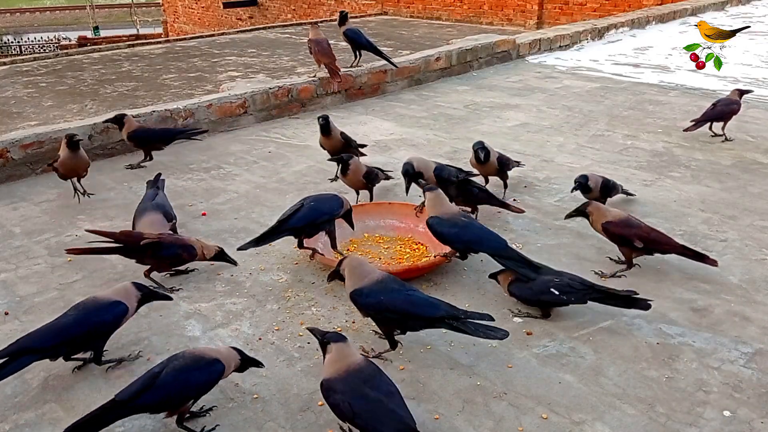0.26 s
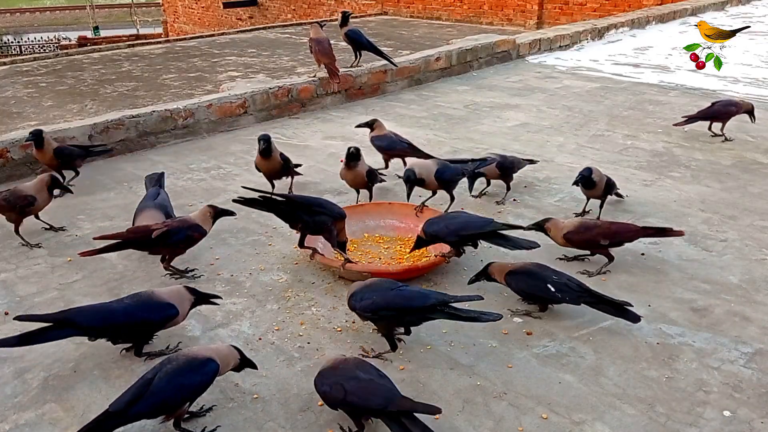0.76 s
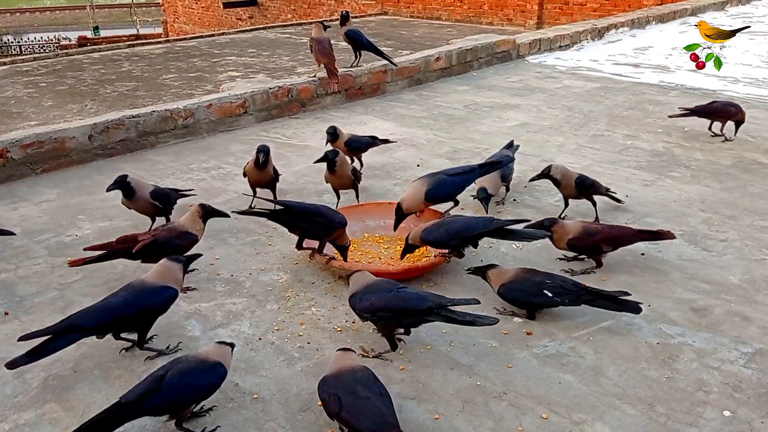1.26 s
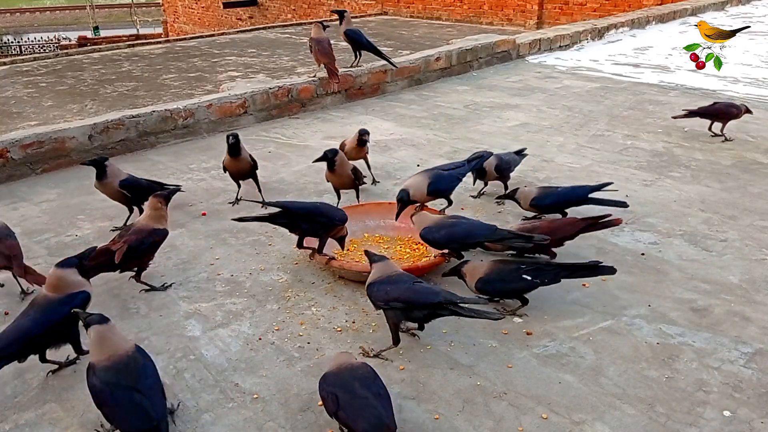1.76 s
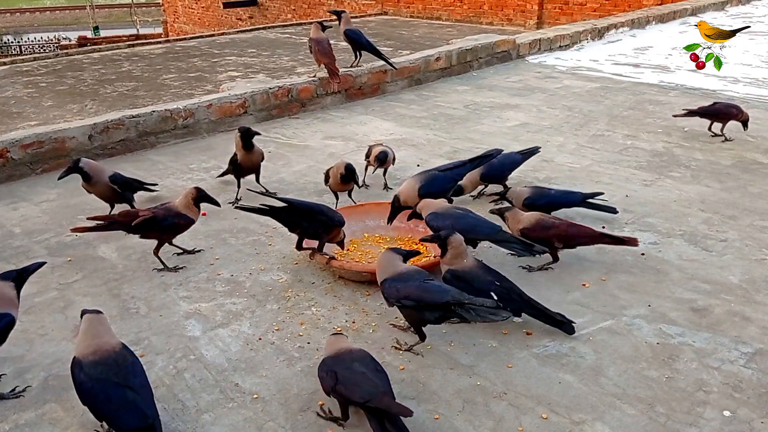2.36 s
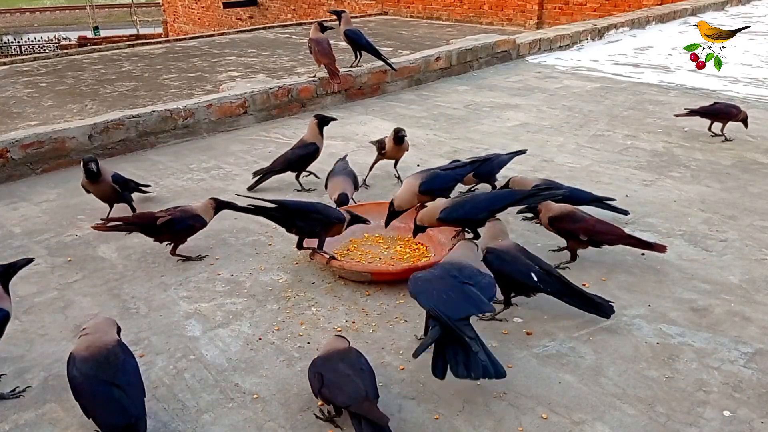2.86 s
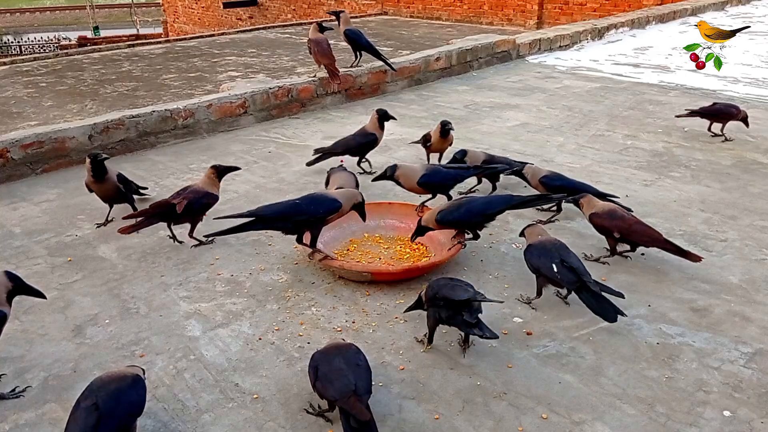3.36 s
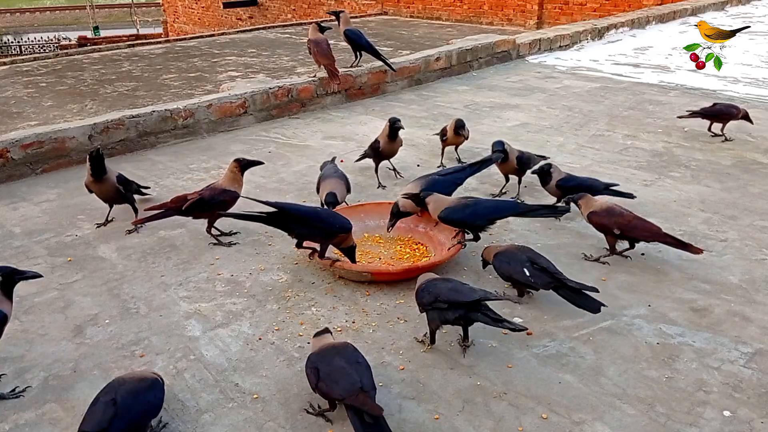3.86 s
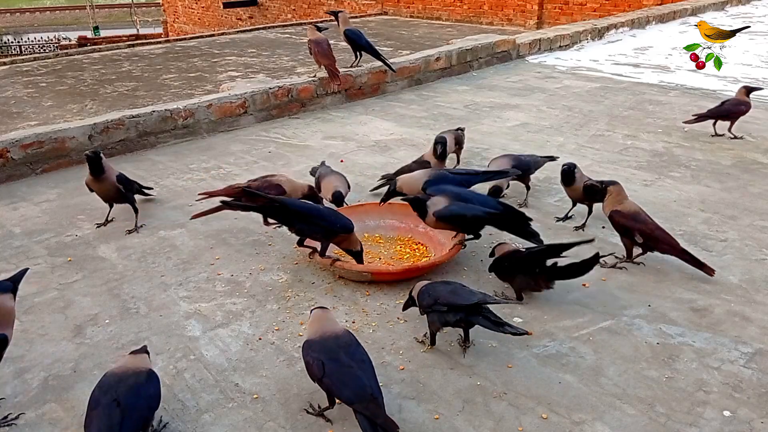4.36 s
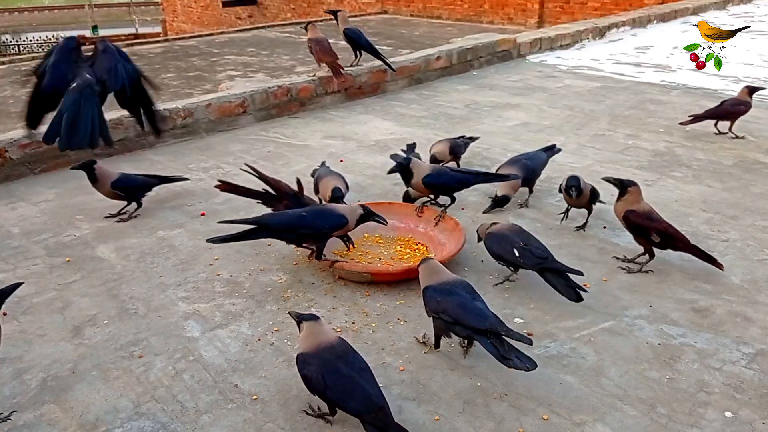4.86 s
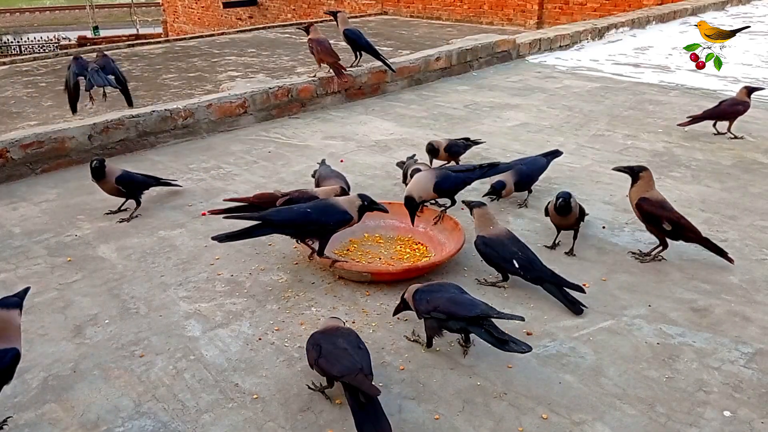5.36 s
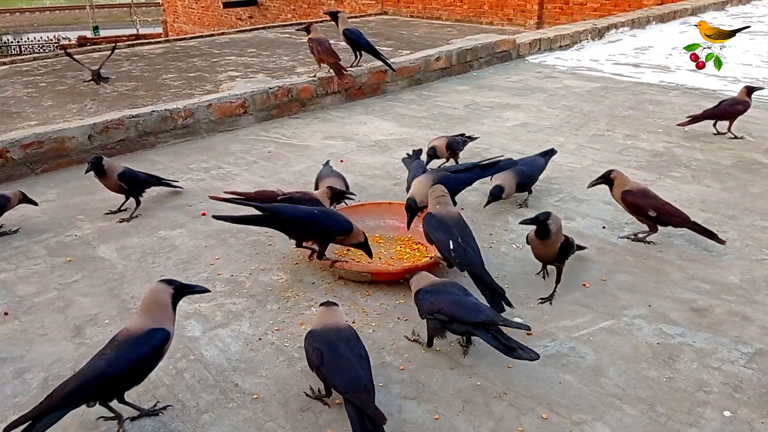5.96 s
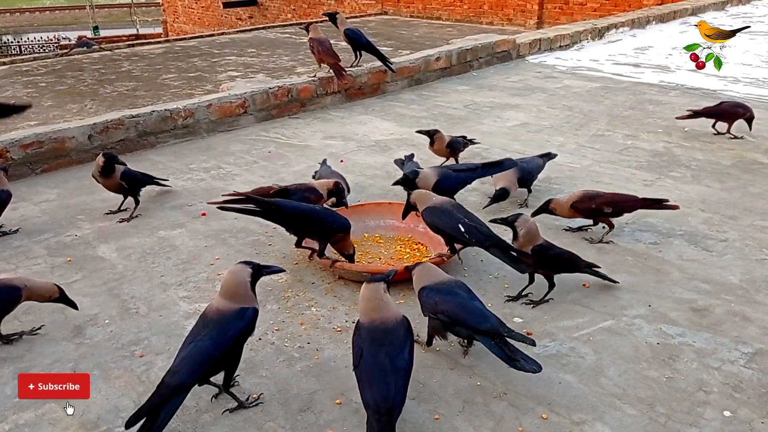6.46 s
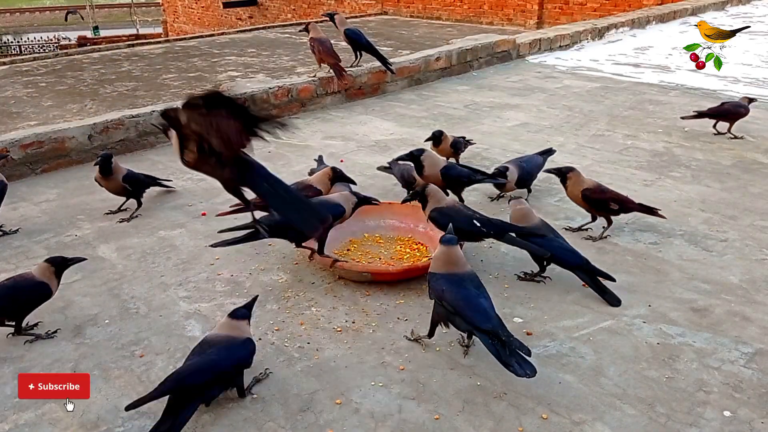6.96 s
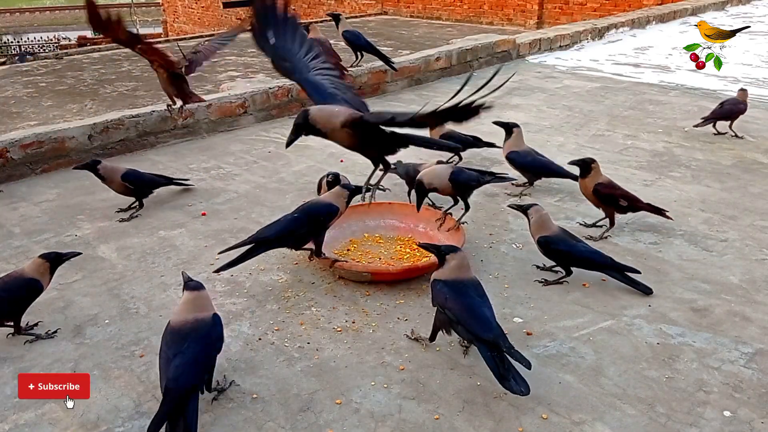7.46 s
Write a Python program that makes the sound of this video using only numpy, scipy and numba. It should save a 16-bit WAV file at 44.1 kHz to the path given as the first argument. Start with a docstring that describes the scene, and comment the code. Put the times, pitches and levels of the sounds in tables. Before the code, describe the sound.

Short buzzing crow caws, hard little beak ticks and rushes of wings on a concrete roof, over faint distant hum and chirps.

```python
"""House crows on a roof

House crows caw round a clay feeding bowl on a concrete roof, more often after the first calls.
Each caw is an arching buzz, shaken about 80 times a second and rung through windpipe, throat and beak.
Beaks peck with hard ticks, wings push rushes of air, claws tick, and small birds chirp far off.
Nearby walls echo all of this over a faint town noise and hum."""
import sys
import numpy as np
from scipy import signal
from scipy.fft import rfft, irfft
from scipy.io import wavfile
from scipy.ndimage import uniform_filter1d, map_coordinates
from numba import njit

SR = 44100
rng = np.random.default_rng(int(sys.argv[2]) if len(sys.argv) > 2 else 0)


def waveform_to_disk(signal):
    """Save audio, clipped to [-1, 1], as 16-bit WAV at the path in sys.argv[1]."""
    frames = np.transpose(np.atleast_2d(signal))
    scaled = np.clip(frames, -1, 1) * 32767
    samples = np.round(scaled).astype(np.int16)
    wavfile.write(sys.argv[1], SR, samples)


N = 340452  # length of the scene [samples]

# colour of crinkling feathers and ticking claws: (frequency [Hz], level [dB])
FEATHERS = [(410, -60), (700, -20), (886, 2.5), (1060, -6.5), (1520, -11), (2000, -7), (2990, -10.5),
            (6230, -4.5), (8100, -21), (13100, -28.5), (16000, -20)]


def undb(db):
    """Turn decibels into a gain."""
    return 10 ** (np.asarray(db) / 20)


def unit(x):
    """Scale to an average (rms) strength of 1."""
    return x / np.sqrt(np.mean(x ** 2) + 1e-20)


def add(out, s, x):
    """Mix x into out from time s."""
    i = max(int(s * SR), 0)
    out[i:i + len(x)] += x[:max(len(out) - i, 0)]


def curve_gain(points, grid_hz):
    """Gains along a curve of (Hz, dB) points, drawn on a logarithmic pitch scale."""
    hz, db = np.transpose(points)
    return undb(np.interp(np.log(np.maximum(grid_hz, 1)), np.log(hz), db))


def colour(x, points):
    """Filter x to follow (Hz, dB) points, with no sound ahead of its cause."""
    size = 2048
    gain = curve_gain(points, np.arange(size // 2 + 1) * SR / size)
    # folding the cepstrum gives the response that acts as early as possible
    cepstrum = irfft(np.log(gain))
    cepstrum[1:size // 2] *= 2
    cepstrum[size // 2 + 1:] = 0
    response = irfft(np.exp(rfft(cepstrum)))
    return signal.fftconvolve(x, response)[:len(x)]


def ring(x, hz, width_hz):
    """One resonance, with gain 1 at its centre."""
    b, a = signal.iirpeak(min(hz, .45 * SR), hz / width_hz, fs=SR)
    return signal.lfilter(b, a, x)


def steep(x, hz, width_hz):
    """A resonance applied twice, so less passes on either side of it."""
    return ring(ring(x, hz, width_hz), hz, width_hz)


@njit
def glide(x, hz, width_hz):
    """A resonance whose centre moves from sample to sample."""
    y, band, low = np.empty(len(x)), 0., 0.
    for i in range(len(x)):
        g, k = np.tan(np.pi * hz[i] / SR), width_hz / hz[i]
        v = (band + g * (x[i] - low)) / (1 + g * (g + k))
        band, low, y[i] = 2 * v - band, low + 2 * g * v, k * v
    return y


def wander(n, rate):
    """Smooth random drift around 0, of spread 1, with rate new targets a second."""
    place = np.arange(n) * rate / SR
    targets = rng.standard_normal(int(place[-1]) + 2)
    return map_coordinates(targets, [place], order=1, mode="nearest") * np.sqrt(3 / 2)


def tone(hz):
    """A pure tone that follows a pitch curve."""
    return np.sin(2 * np.pi * np.cumsum(hz) / SR)


def even(x, size=1100):
    """Hold the slow level near 1 and keep the fast flutter."""
    power = uniform_filter1d(uniform_filter1d(x ** 2, size), size // 2)
    return x / np.sqrt(power + 1e-14)


def town(wash_db=-58, waver_db=2.0):
    """Distant town noise is a low wash of noise plus a hum whose bands waver on their own."""
    # colour of the wash: (frequency [Hz], level [dB])
    wash_colour = [(15, -56), (25, -37.5), (70, -2.5), (130, -7), (195, -9), (223, -12.5), (344, -6),
                   (476, -22), (607, -12.5), (754, -26), (1700, -24), (3520, -33.5), (6380, -36),
                   (7920, -48.5), (16000, -52.5)]
    # bands of the hum: (frequency [Hz], width [Hz], level before the slow drift [dB])
    hum_bands = [(78.6, 8, -65), (338.7, 5.4, -61.5), (380, 51, -66), (608, 32, -76.5)]
    # slow drift of the hum's level: (time [s], change [dB])
    hum_drift = [(0, 3.5), (1.3, -2), (2.5, -13.5), (3.3, -5), (5.6, 0.5), (7.7, 3)]
    gain = curve_gain(wash_colour, np.arange(N // 2 + 1) * SR / N)
    wash = unit(irfft(rfft(rng.standard_normal(N)) * gain, N))
    hum = np.zeros(N)
    for hz, width, db in hum_bands:
        band = steep(rng.standard_normal(N), hz, width) * undb(waver_db * wander(N, 14))
        hum += undb(db) * unit(band)
    drift_db = np.interp(np.arange(N) / SR, *np.transpose(hum_drift))
    return wash * undb(wash_db) + hum * undb(drift_db)


def far_notes(notes, waver, waver_rate):
    """Thin, slightly wavering whistled tones that swell and fade."""
    out = np.zeros(N)
    for s, length, from_hz, to_hz, db in notes:
        n = int(length * SR)
        hz = np.linspace(from_hz, to_hz, n) * (1 + waver * wander(n, waver_rate))
        add(out, s, tone(hz) * np.hanning(n) * undb(db))
    return out


def far_birds(chirp_db=-1, hoot_db=-1):
    """Far birds give high chirps and soft low hoots, each a sliding tone."""
    # both: (time [s], length [s], start pitch [Hz], end pitch [Hz], level before the group's gain [dB])
    chirps = [(0.464, 0.056, 5240, 5800, -63), (0.519, 0.075, 6250, 5740, -61.5),
              (0.612, 0.086, 4060, 4350, -59.5), (0.717, 0.067, 4300, 4060, -64),
              (1.225, 0.053, 5140, 5030, -67), (2.23, 0.06, 6200, 5030, -54),
              (2.27, 0.041, 4430, 4300, -61), (2.537, 0.069, 7000, 5800, -55.5),
              (2.585, 0.083, 6000, 6470, -58.5), (2.73, 0.076, 6900, 6100, -69)]
    # the low notes are perhaps doves
    hoots = [(0.28, 0.19, 650, 620, -53.5), (0.47, 0.18, 350, 400, -51), (0.66, .26, 650, 574, -55.5),
             (2.1, 0.35, 570, 630, -56)]
    high = far_notes(chirps, waver=.03, waver_rate=1100) * undb(chirp_db)
    low = far_notes(hoots, waver=0.057, waver_rate=130) * undb(hoot_db)
    return high + low


def claws(count=80, level_db=-59, spread_db=4, tick_s=0.005):
    """Claws and seeds make faint ticks on the concrete: short noise bursts, levels set before colouring."""
    out, t = np.zeros(N), np.arange(SR // 30) / SR
    for s, size in zip(rng.uniform(0, N / SR, count), rng.standard_normal(count)):
        tick = rng.standard_normal(len(t)) * np.exp(-t / tick_s)
        add(out, s, tick * undb(level_db + spread_db * size))
    return colour(out, FEATHERS)


def wing(n, hz, air_db, feather_db, breadth=0.21, swish_db=-15, crinkle_db=2.5):
    """A moving wing pushes a low rush of air; its feathers swish and crinkle."""
    rush = even(steep(rng.standard_normal(n), hz, hz * breadth + 60), size=600)
    swish = unit(ring(rng.standard_normal(n), 950, 830))
    uneven_noise = rng.standard_normal(n) * undb(crinkle_db * wander(n, 230))
    crinkle = unit(colour(uneven_noise, FEATHERS))
    return undb(air_db) * (rush + undb(swish_db) * swish) + undb(feather_db) * crinkle


def wings(rush_hz=388.5, stroke_s=0.15, beat_hz=8.81, beat_db=3.5, unevenness=0.37, fade_s=0.15):
    """Wings beat unevenly in flurries, with single strong strokes on top."""
    # birds jostle, take off and land: (start [s], end [s], air before beating [dB], feathers likewise [dB])
    flurries = [(3.622, 3.956, -52, -65), (4.36, 5.45, -54, -58), (6.78, 7.612, -55.5, -67)]
    # strokes that stand out: (strongest time [s], rush pitch [Hz], air at its peak [dB], feathers likewise [dB])
    strokes = [(3.705, 389, -47, -66), (3.914, 411.5, -45, -62.5), (4.035, 363.3, -44.5, -56),
               (4.11, 438.5, -42, -62), (4.577, 229.7, -39, -49), (4.603, 419, -46, -57),
               (4.732, 402, -48.5, -57), (4.905, 334, -44.5, -54.5), (4.967, 396, -43.5, -74),
               (5.058, 212.3, -42, -58), (5.117, 369, -41, -51.5), (5.287, 379.5, -49, -53.5),
               (5.447, 358, -46.5, -60), (6.901, 396.4, -46.5, -53), (6.996, 200.7, -31.5, -45),
               (7.127, 199, -51, -64), (7.203, 448.4, -45, -50), (7.479, 226.6, -47, -75),
               (7.537, 406, -46.5, -80)]
    out = np.zeros(N)
    for start, end, air_db, feather_db in flurries:
        n = int((end - start) * SR)
        beat = tone(beat_hz * (1 + unevenness * wander(n, 12.23)))
        swell = signal.windows.tukey(n, 2 * fade_s / (end - start))
        add(out, start, wing(n, rush_hz, air_db, feather_db) * swell * undb(beat_db * beat))
    for s, hz, air_db, feather_db in strokes:
        n = int(stroke_s * hz / rush_hz * SR)  # deeper strokes are shorter in proportion
        add(out, s - n / SR / 2, wing(n, hz, air_db, feather_db) * np.hanning(n) ** 2)
    return out


def pecks(tick_s=0.0012, scatter_s=0.02, scatter_db=-16, ring_db=7):
    """A peck is a hard tick, a short ring of beak and bowl, and a scatter of grain."""
    # beaks on bowl and concrete: (time [s], peak level [dB], ring pitch [Hz], body against the tick [dB])
    blows = [(0.309, -39.5, 5670, -3), (0.5148, -42.5, 5900, -35), (0.85, -32, 6150, -7.5),
             (1.1139, -24.5, 3830, -12.5), (1.357, -46.5, 3000, 11), (1.487, -44, 6700, -25),
             (1.853, -39, 6200, -2), (2.0448, -33, 5450, -10), (2.214, -34, 6240, -15),
             (2.3328, -40.5, 6700, -9), (2.8718, -23, 5470, 9), (3.0002, -21, 5230, 2.5),
             (3.137, -51, 3150, -23), (3.325, -46, 5270, 14), (3.8454, -27, 6800, -8),
             (4.458, -33.5, 6500, -25), (4.5356, -33.5, 6330, -12), (4.7266, -38, 5410, 5),
             (5.9538, -33.5, 6700, -5), (5.988, -37.5, 5490, 1.5), (6.4117, -28.5, 5960, 8)]
    # colour of the tick: (frequency [Hz], level [dB])
    tick_colour = [(180, -39), (300, -8), (885, -32.5), (2480, 0.5), (3030, -11), (3760, -8), (4520, -2.5),
                   (6410, -2), (8090, -19.5), (12300, -19), (16000, -13.5)]
    out, t = np.zeros(N), np.arange(SR // 10) / SR
    fade = np.exp(-t / tick_s) + undb(scatter_db) * np.exp(-t / scatter_s)
    for s, db, hz, body_db in blows:
        blow = rng.standard_normal(len(t)) * fade
        tick = colour(blow, tick_colour)
        bright = unit(tick + undb(ring_db) * ring(tick, hz, 460))
        body = unit(steep(blow, 1730, 1300))
        sound = bright + undb(body_db) * body
        add(out, s, sound / np.abs(sound).max() * undb(db))
    return out


def syrinx(hz, along, depth, settle, rough, flutter_hz=78.28, skew=0.34, throb_db=5.0, throb_lag=0.57,
           throb_fade=1.0, flutter_jitter=0.067, fray=3.09, shimmer_db=1.45):
    """Membranes in the voice organ buzz near 500 Hz while a slower flutter shakes pitch and strength."""
    n = len(hz)
    loose = 0.416 + fray * np.abs(along - .33)  # steadiest a third of the way in, fraying at both ends
    flutter_rate = flutter_hz * (1 + flutter_jitter * loose * wander(n, 119.7))
    flutter = 2 * np.pi * np.cumsum(flutter_rate) / SR
    swing = depth * (1 - settle * along ** 2) * (np.sin(flutter) + skew * np.sin(2 * flutter))
    phase = 2 * np.pi * np.cumsum(hz * (1 + swing + rough * loose * wander(n, 500))) / SR
    orders = np.arange(1, 33)[:, None]
    # the low harmonics are locked to the closing membranes, the high ones scatter
    scatter = rng.uniform(0, 2 * np.pi, orders.shape) * (orders > 4)
    buzz = unit(np.cos(orders * phase + scatter).sum(axis=0))
    throb = np.cos(flutter - throb_lag) * (1 - throb_fade * along)  # hardest while air pressure is high
    strength = undb(throb_db * throb + shimmer_db * loose * wander(n, 300))
    return buzz, strength, throb


def rasp(harsh, gape, beak, treble_db, follow=0.42, broad_db=-10, round_trip_s=0.00124, bounce=0.65):
    """The bright part of a caw: beak resonances and a windpipe echo, all gliding with the gape."""
    # colour of the rasp that leaves the open beak: (frequency [Hz], level [dB])
    beak_colour = [(2100, -45.5), (2800, -17), (3300, -5), (4050, 4), (5600, 0), (6900, 3.5), (8300, -7),
                   (9700, -8), (11000, -19.5), (12300, -20), (13600, -26), (15200, -12)]
    peaks = np.zeros(len(harsh))
    for hz, width, db in beak:
        peaks += undb(db) * glide(harsh, hz * gape ** follow, float(width))
    delay = round_trip_s * SR / gape ** follow
    echo = map_coordinates(harsh, [np.arange(len(harsh)) - delay], order=3)
    bright = peaks + undb(broad_db) * (harsh + bounce * echo)
    return colour(colour(bright, beak_colour), [(5500, 0.006), (10000, treble_db)])


def effort(t, length, attack_s, droop_db, release_s, onset_db=-25, end_db=-11.5):
    """Loudness of a caw in dB: a quick push, a droop as the air runs out, a short release."""
    closing = np.clip(1 - (length - t) / release_s, 0, 1)
    return onset_db * np.exp(-t / attack_s) - droop_db * (t / length) ** 2 + end_db * closing


def caw(row, beak, air_db=-27, hiss_db=-9, rasp_throb_db=0.0, throat_follow=0.41, skirt_hz=1400.0,
        edge=0.87, windpipe_width_hz=420.0, low_cut_hz=560, bite_db=5.5, bite_s=0.048, shut_rasp_db=-4):
    """The buzz rings windpipe, throat and beak, whose resonances move as the beak opens and shuts."""
    # pitch arch through a caw, before its depth is applied: (share of the length, share of the pitch)
    pitch_arch = [(0, .73), (.1, .89), (.2, 0.97), (.36, 0.98), (.6, 0.96), (.8, .855), (.9, .745),
                  (1, .52)]
    (start, end, level_db, attack_s, droop_db, release_s, top_hz, arch_depth, depth, settle, rough,
     throat_hz, throat_width_hz, pipe_db, rasp_db, treble_db) = row
    n = int((end - start) * SR)
    t, along = np.arange(n) / SR, np.arange(n) / n
    gape = np.interp(along, *np.transpose(pitch_arch)) ** arch_depth
    buzz, strength, throb = syrinx(top_hz * gape, along, depth, settle, rough)
    air = rng.standard_normal(n)
    source = strength * (buzz + undb(air_db) * air)

    quiver = gape * (1 + 16 * rough ** 2 * wander(n, 450))  # the hoarsest calls shake the whole throat
    centre = throat_hz * quiver ** throat_follow
    throat = glide(glide(source, centre, float(throat_width_hz)), centre, skirt_hz)
    edge_hz = max(throat_hz + edge * throat_width_hz, 2250)  # the throat passes little above its resonance
    throat = signal.sosfilt(signal.butter(6, edge_hz, fs=SR, output="sos"), throat)
    second_hz = 2 * top_hz * gape  # the windpipe stays tuned to the second harmonic
    windpipe = glide(glide(source, second_hz, windpipe_width_hz), second_hz, windpipe_width_hz)
    shut_db = np.interp(along, [.85, 1], [0, -9])  # the closing beak muffles throat against windpipe
    voice = undb(shut_db) * throat + undb(pipe_db) * windpipe
    voice = signal.sosfilt(signal.butter(4, low_cut_hz, "high", fs=SR, output="sos"), voice)

    harsh = strength * undb(rasp_throb_db * throb) * (buzz + undb(hiss_db) * air)
    # extra rasp at the first push fades, and a narrower beak holds some back
    extra_db = bite_db * np.exp(-t / bite_s) + shut_rasp_db * (1 - gape)
    bright = even(rasp(harsh, quiver, beak, treble_db)) * undb(rasp_db + extra_db)
    loudness = undb(level_db + effort(t, end - start, attack_s, droop_db, release_s))
    return (even(voice) + bright) * loudness * signal.windows.tukey(n, .05)


def groan(top_hz, length_s=.1, from_share=1.8, to_share=0.7, waver=0.038):
    """The slackening membranes end a caw with a soft tone that slides down."""
    n = int(length_s * SR)
    hz = top_hz * np.geomspace(from_share, to_share, n) * (1 + waver * wander(n, 300))
    return tone(hz) * np.hanning(n)


def crows(gain_db=-0.8, groan_db=-11, groan_lead_s=.055, groan_rough=0.013):
    """Crows caw in turn; clear voices that are still strong at the end leave the most groan."""
    # one caw a row: (start [s], end [s], level before the crows' gain [dB], attack [s],
    #   droop by the end [dB], release [s], pitch at the arch's share 1 [Hz], arch depth [power],
    #   flutter depth [share of pitch], flutter lost by the end [share], roughness [share of pitch],
    #   throat at full gape [Hz], throat width [Hz], windpipe [dB], rasp before bite [dB], treble at 10 kHz [dB])
    calls = [ (0.013, 0.273, -23.5, 0.017, 12, 0.024, 491, 1.25, 0.068, 0, 0.038, 1904, 660, -5.5, -11.5, -8.5),
             (1.527, 1.822, -21, 0.02, 10.5, 0.048, 503.8, 1.1, 0.09, 0.027, 0.052, 1867, 520, -10, -14, -3),
             (2.802, 3.055, -24.5, .017, 11, 0.021, 498, 0.93, 0.078, 0, 0.045, 1937, 503, -8.5, -13, -7.5),
             (3.471, 3.563, -45.5, 0.028, -2, 0.022, 480, 0.36, 0.19, 0.067, 0.08, 1960, 506, -6, -13, -5),
             (3.549, 3.816, -21.5, 0.013, 11.5, 0.03, 508.5, 1.2, 0.083, 0, 0.032, 2007, 534, -7.5, -13, -0.5),
             (4.01, 4.332, -21.5, 0.019, 3.5, .055, 542.3, 0.69, 0.07, 0.35, 0.011, 2008, 263, -12.5, -14, -8.5),
             (5.573, 5.898, -25.5, 0.016, 5.5, .055, 559, .9, 0.058, 0.55, 0.016, 2100, 215, -22, -15, -28.5),
             (6.073, 6.323, -21, 0.019, 3.5, 0.037, 445, .6, 0.065, 0.08, 0.0097, 1710, 310, -16, -19.5, 0),
             (6.432, 6.741, -37, .022, 8.5, 0.084, 458, 1, 0.1, 0.08, 0.076, 1880, 650, -7, -10, -9.5),
             (6.987, 7.266, -26.5, 0.018, 4.5, 0.047, 544.5, 0.91, 0.082, 0.17, 0.033, 1800, 400, -17, -17, -14.5),
             (7.258, 7.438, -46.5, 0.0016, 11.5, 0.024, 490, 0.79, 0.11, 0.08, 0.073, 1920, 675, -19, -7.5, 0)]
    # resonances of the open beak, one set a caw: (frequency at full gape [Hz], width [Hz], level [dB])
    beaks = [
        [(5630, 130, 2.5), (6550, 94, -2.5)],
        [(4260, 63, 4), (5710, 280, -1.5), (6700, 122, -5.5)],
        [(3970, 78, -10), (5600, 220, -1.5), (6560, 70, -6)],
        [(5660, 260, -3)],
        [(4170, 128, -5), (5640, 170, -2.5), (6930, 114, -0.5)],
        [(4465, 50, 1.5), (5960, 87, 3), (6410, 130, -7)],
        [(4060, 53, -20), (4470, 140, -0.5), (5160, 162, -5.5)],
        [(3880, 250, 4), (5660, 100, -3), (6130, 70, 3)],
        [(3870, 72, 11.5), (6020, 170, 7)],
        [(4120, 68, 2), (6000, 160, -3)],
        [(3950, 280, 13)],
    ]
    out = np.zeros(N)
    for row, beak in zip(calls, beaks):
        start, end, level_db, _, droop_db, _, top_hz, _, _, _, rough = row[:11]
        add(out, start, caw(row, beak))
        groan_gain = undb(level_db - droop_db + groan_db) * np.exp(-rough / groan_rough)
        add(out, end - groan_lead_s, groan(top_hz) * groan_gain)
    return out * undb(gain_db)


def roof(x, near_db=-14, near_s=0.012, far_db=-26, t60_s=0.59, slap_s=0.13, slap_db=-26, count=24):
    """Quick reflections off floor and parapet, then a slap and a dull tail from the houses around."""
    t = np.arange(SR) / SR
    near = np.zeros(SR)
    lags = rng.uniform(0.002184, .04, count)
    near[(lags * SR).astype(int)] = rng.choice([-1, 1], count) * np.exp(-lags / near_s)
    near *= undb(near_db) / np.linalg.norm(near)
    tail = rng.standard_normal(SR) * np.exp(-np.log(1000) * t / t60_s) * np.minimum(t / 0.082, 1)
    far = undb(far_db) * tail / np.linalg.norm(tail)
    far[int(slap_s * SR)] += undb(slap_db)
    # levels of slap and tail are set before this colouring
    far = colour(far, [(300, 7), (1000, 2), (2000, -4), (4500, 0), (9000, -16)])
    return x + signal.fftconvolve(x, near + far)[:N]


def scene():
    """The flock on its echoing roof, over the town."""
    birds = far_birds() + claws() + wings() + pecks() + crows()
    return (town() + roof(birds))[None]


def record(dry, top_hz=15900):
    """Cut the treble steeply above top_hz."""
    return signal.sosfilt(signal.ellip(10, .2, 70, top_hz, fs=SR, output="sos"), dry)


dry = scene()
out = record(dry)
waveform_to_disk(out)
```